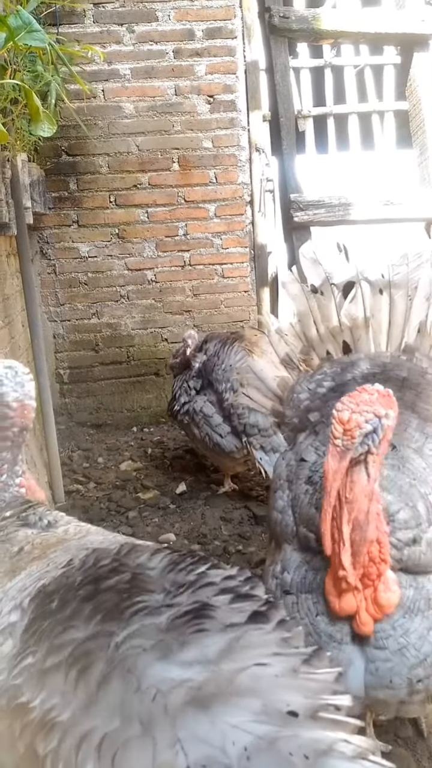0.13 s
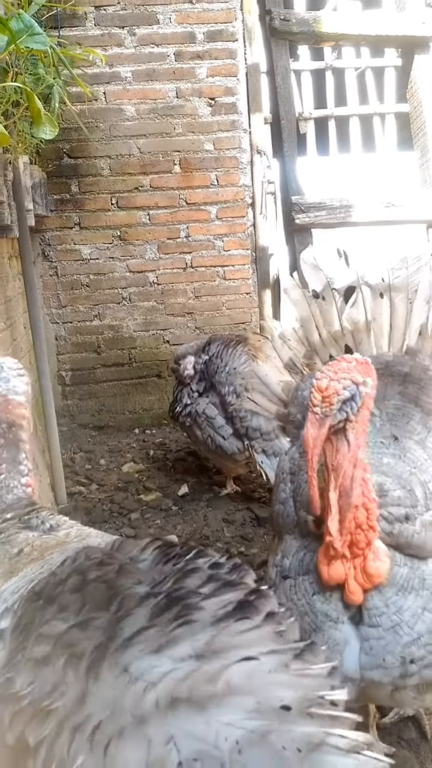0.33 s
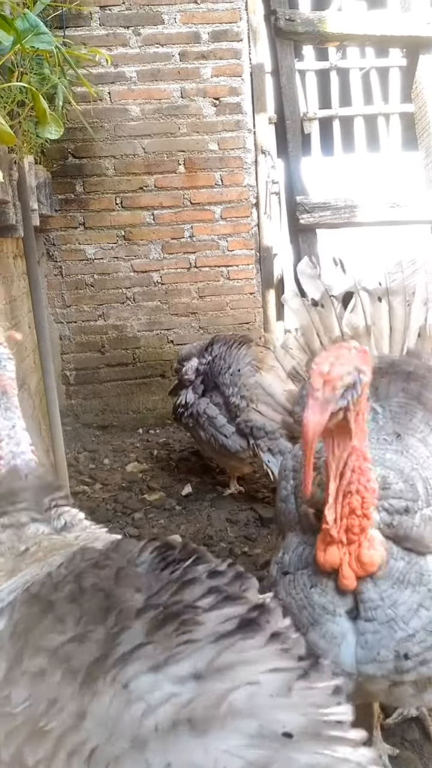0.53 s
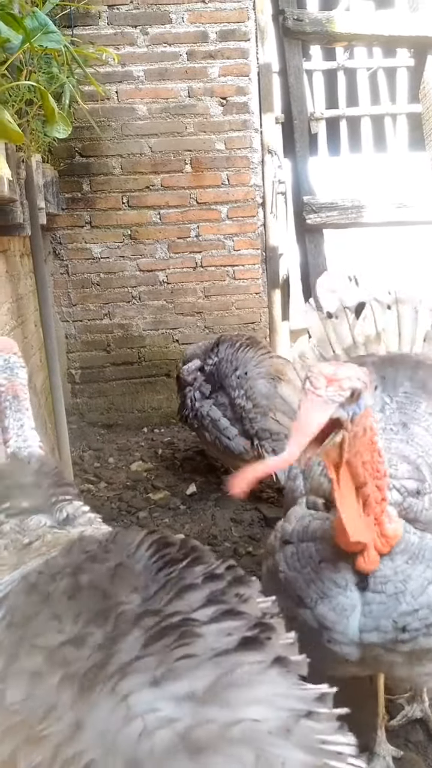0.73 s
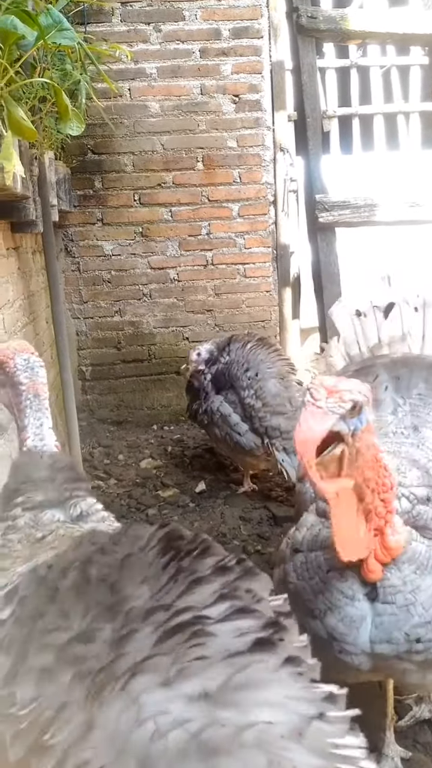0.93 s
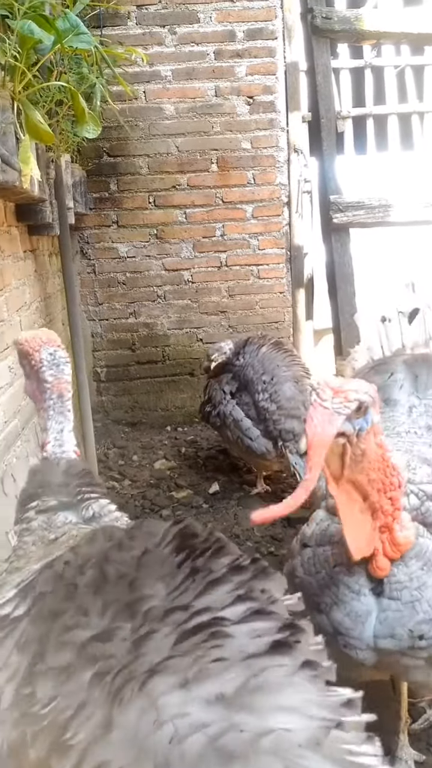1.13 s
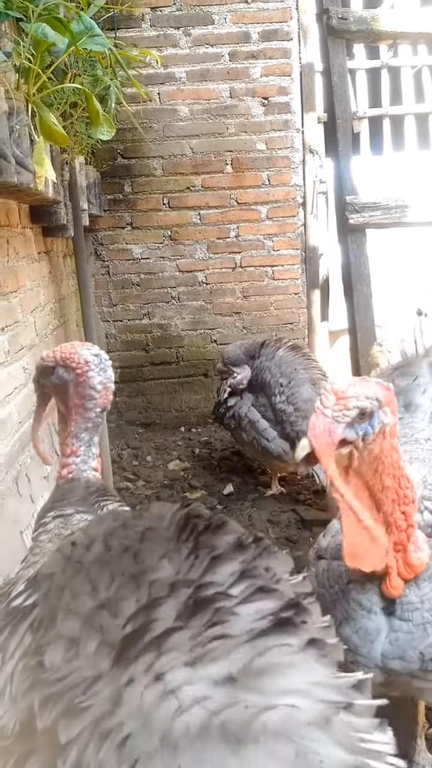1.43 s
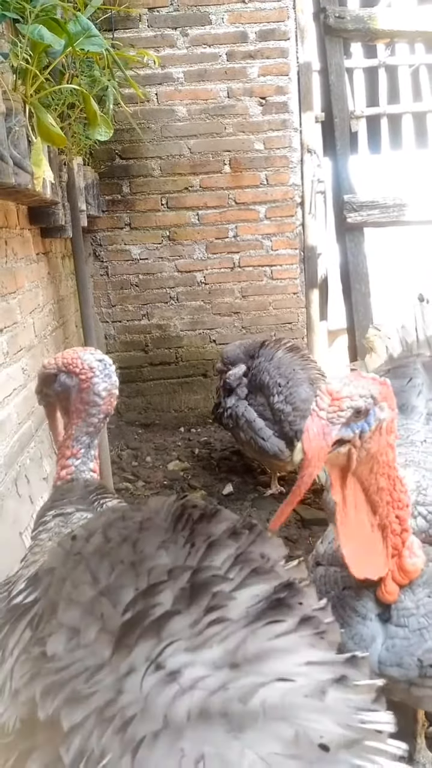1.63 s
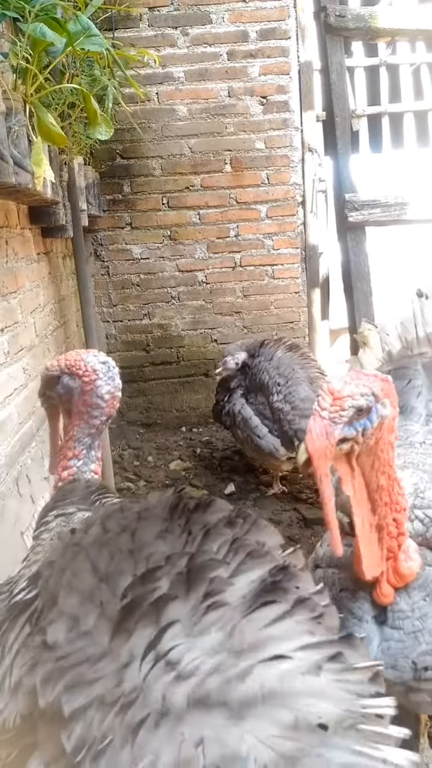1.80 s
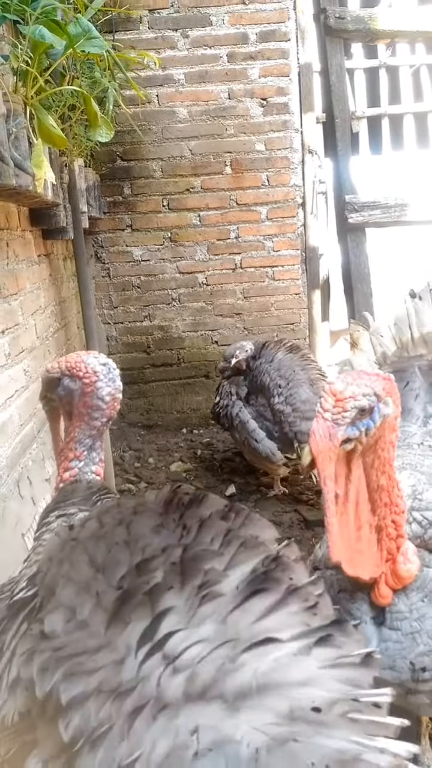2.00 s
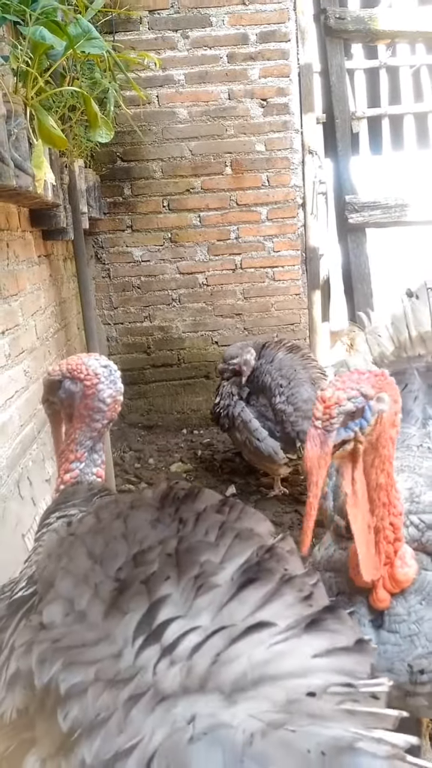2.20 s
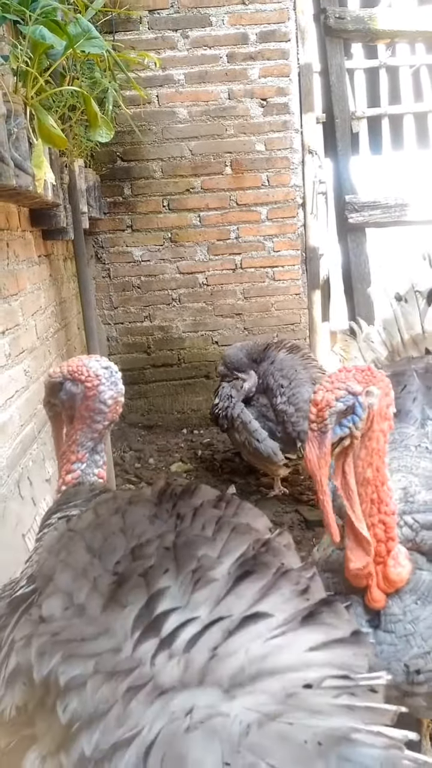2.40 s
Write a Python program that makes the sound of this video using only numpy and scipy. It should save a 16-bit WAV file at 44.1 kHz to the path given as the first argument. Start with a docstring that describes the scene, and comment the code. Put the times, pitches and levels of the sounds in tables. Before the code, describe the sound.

One loud, rattling turkey gobble in a small yard, followed by faint distant turkey calls.

```python
"""In a small brick yard a turkey gobbles close by: three clear yelps break into a rough rattle.
Pushes of air drive a membrane in its syrinx, and the resonances of windpipe and beak shape the tone and
its turbulence. Short whistles glide, most near 1 kHz, and a few bright overtones ring out higher up.
The wattle flaps, other turkeys answer faintly, feathers rustle and something taps once.
The walls reflect the calls, and a low hum and a thin high whine lie underneath."""
import sys
import numpy as np
from scipy import signal
from scipy.fft import rfft, irfft
from scipy.io import wavfile
from scipy.ndimage import uniform_filter1d

SR = 44100
rng = np.random.default_rng(int(sys.argv[2]) if len(sys.argv) > 2 else 0)


def to_wav(sig):
    """Store sig (one row per channel, or 1-D mono) as 16-bit WAV at the path in sys.argv[1].

    Samples outside -1..1 are clipped; the rate is SR.
    """
    pcm = np.clip(np.atleast_2d(sig), -1, 1) * 32767
    pcm = np.round(pcm).astype(np.int16)
    wavfile.write(sys.argv[1], SR, pcm.T)  # frames by channels


N = 112454
TIME = np.arange(N) / SR

# Envelope of the hum. Each row: time in seconds, level in dB.
HUM_ENVELOPE = [(0, -102), (.17, -64), (.22, -56), (1.05, -51.5), (1.3, -68), (1.85, -64.5), (1.96, -64),
                (2.02, -63), (2.12, -69), (2.22, -76), (2.55, -93)]
# Spectra of the steady noises. Each row: frequency in Hz, level in dB.
HUM_SPECTRUM = [(25, -29), (50, -27.5), (70, -8), (88, 3), (110, -9.5), (160, -18.5), (400, -32.5),
                (800, -46)]
AIR_SPECTRUM = [(30, -14.5), (70, -8.5), (130, 0.5), (350, -5), (800, -15), (2000, -12.5), (4000, -15),
                (5700, -18.5), (7000, -23.5), (11000, -21), (14000, -31.5)]
# Three stages of the gobble. Each row: time in seconds, pitch in Hz, roughness from 0 to 1.
YELPS = [(0.182, 527, 0.42), (0.214, 602.3, 0.08), (.24, 573.9, 0.22), (0.267, 577.2, 0.27),
         (.285, 662.3, 0.02), (.305, 712.6, 0), (0.321, 705, 0.04), (.337, 629.2, 0.14), (0.346, 560, 0.45),
         (.365, 609, 0.06), (0.389, 663.1, 0.01), (.422, 643, 0.04), (.442, 580, 0.3)]
GARGLE = [(0.482, 627.2, 0.92), (0.511, 593, 0.073), (0.549, 679, 0.45), (0.576, 673, 0.53),
          (0.592, 617, 0.04), (0.618, 597.4, 0.03), (0.636, 633.4, 0.14), (0.652, 720.5, 0.46),
          (0.692, 609.5, 0.95)]
RATTLE = [(0.749, 612.6, 0.58), (0.771, 662.1, .8), (0.813, 622.3, 0.45), (.843, 722.5, 0.57),
          (.868, 662, 0.37), (0.909, 596.5, 0.63), (.955, 664.4, 1), (0.984, 633.3, 0.31),
          (1.019, 600.6, 0.89), (1.064, 652.3, 0.4), (1.105, 646.3, 0.59), (1.145, 615, 0.97),
          (1.18, 591.5, 0.53)]
# Pushes of air. Each row: peak time, rise and fall in seconds, then levels in dB of the four bands
# of the voice: fundamental, octave, overtones and treble.
PUSHES = [(0.196, 0.0083, 0.0069, -31.5, -30.5, -35, -49), (0.213, 0.0063, 0.015, -25, -25, -10.5, -32.5),
          (0.229, 0.0043, 0.015, -30.5, -27, -14.5, -32.5), (.256, 0.012, 0.055, -36.5, -31, -29, -44),
          (0.292, 0.0075, 0.0049, -21, -4, -25, -36.5), (0.313, 0.02, 0.009, -23, -13, -16.5, -28),
          (.329, 0.0062, 0.004, -11.5, -20.5, -23.5, -27), (0.352, 0.0055, 0.013, -21.5, -19.5, -14.5, -43),
          (0.394, 0.026, 0.014, -21, -9.5, -21.5, -23.5), (.414, 0.0077, .012, -27.5, -15.5, -21.5, -19),
          (.429, 0.011, 0.0098, -11.5, -26, -21.5, -24), (0.489, 0.015, 0.005, -20.5, -15.5, -22.5, -30),
          (0.501, 0.011, 0.017, -13.5, -26, -26.5, -33.5), (0.545, 0.024, 0.016, -16, -18.5, -18.5, -27.5),
          (.569, 0.0066, 0.0069, -17, -13, -17, -24.5), (.586, 0.005, 0.0099, -15, -14.5, -26, -15),
          (0.61, 0.019, 0.015, -25, -24, -15.5, -26), (0.639, 0.018, 0.013, -16.5, -16.5, -24.5, -19),
          (.654, 0.0074, 0.012, -15, -20, -17, -26.5), (0.724, 0.0061, 0.009, -17.5, -31, -27.5, -31.5),
          (0.765, 0.0069, 0.014, -15, -24, -22.5, -24), (.843, 0.011, 0.016, -14, -21, -17.5, -18.5),
          (0.918, 0.005, 0.016, -20, -34.5, -29, -35), (0.958, 0.0068, 0.018, -23, -31.5, -25, -34.5),
          (0.991, 0.024, 0.058, -24, -42, -35, -52), (1.066, 0.012, 0.014, -26.5, -28.5, -22, -29),
          (1.106, 0.019, 0.012, -25.5, -34.5, -32.5, -48), (1.146, 0.011, 0.014, -19.5, -31.5, -29, -35),
          (1.177, 0.005, .008, -28, -26.5, -29, -30.5)]
# One fraction for each band: shimmer depth at full roughness; turbulent amplitude at zero roughness.
SHIMMER_DEPTHS = [.6, .6, .45, .3]
HOARSENESS = [.14, .08, .14, .3]
ROUGH_TURBULENCE = [.85, .6, .6, .9]  # turbulent amplitude added at full roughness
# Spectra of the upper two bands and of the breath. Each row: frequency in Hz, level in dB.
OVERTONE_SPECTRUM = [(1500, -25), (1750, -9), (2100, 4), (2400, 2.5), (2750, -4), (3050, -1), (3400, -6.5),
                     (3800, -57)]
TREBLE_SPECTRUM = [(3000, -38), (3600, -5), (4050, -4.5), (4500, -4), (5100, -17), (5900, -14.5),
                   (6700, -23.5), (8000, -10), (9200, -20), (10400, -11), (12000, -22), (14000, -28.5)]
PUFF_SPECTRUM = [(30, -7.5), (70, -10), (150, -6.5), (300, -8.5), (450, -3), (700, 6), (1500, 0)]
# Windpipe resonances. Each row: centre in Hz, width in Hz, level in dB.
HISS_RESONANCES = [(3960, 200, 1.5), (4430, 350, -3.5), (5050, 300, -5.5), (5710, 300, -5.5),
                   (8300, 500, -7.5), (10450, 670, -2.5)]
# Filter of the beak, and a further one while it is half shut. Each row: frequency in Hz, gain in dB.
BEAK_RESPONSE = [(40, -2.5), (380, -2), (500, -8), (600, -0.5), (700, -3), (790, -0.5), (1050, 0),
                 (1420, -1), (1600, -1.5), (14500, 0.5)]
HALF_SHUT_RESPONSE = [(40, 1), (3300, -1), (4100, -10.5), (4800, -1.5), (5800, 1), (7500, -5.5),
                      (10000, 7.5), (14500, 4.5)]
# Reflections from the ground and near walls. Each row: delay in seconds, gain in dB.
ECHOES = [(.0047, -24), (0.0107, -20.5), (.0192, -21.5)]
# Spectra of the yard's two reverberant tails. Each row: frequency in Hz, level in dB.
LOW_TAIL = [(60, 9.5), (2500, -2.5), (4000, -6)]
HIGH_TAIL = [(2200, -2), (3600, -7.0), (14000, 1.5)]
# Whistles, most near 1 kHz, with a few bright overtones of the voice higher up; and a distant squeak.
# Each row: peak time and half length in seconds, pitch in Hz, glide in Hz per second, level in dB.
WHISTLES_AND_OVERTONES = [(.329, .004, 3328, -25000, -24), (.357, 0.0096, 2342, 11000.5, -16.5),
                          (.494, .004, 3990, -15000, -23), (.547, 0.0092, 3870, -1, -24),
                          (.577, 0.0012, 3990, 1, -11), (.587, 0.0043, 4020, -4.5, -16),
                          (.644, 0.0023, 3993, -1.5, -16.5), (.676, 0.0071, 1076, -3000, -22),
                          (.715, 0.012, 1091, -1000, -25.5), (.763, 0.0044, 1046, 2014, -16.5),
                          (.782, 0.008, 1088, -3000, -12.5), (.829, .008, 978, 4499, -7.5),
                          (.872, 0.0076, 1065, 991.5, -22.5), (.917, 0.0046, 1034, -3000, -18.5),
                          (.958, 0.011, 1008, 2014, -21), (1.046, 0.0079, 987, 2009, -21),
                          (1.133, 0.0044, 1005, -6000, -19.5), (1.156, .009, 998.2, 2003, -26.5),
                          (1.176, 0.0043, 1100, 984, -22)]
SQUEAK = [(1.41, 0.0397, 3460, -400, -58)]
# Answering calls. Each row: peak time, rise and fall in seconds, pitch in Hz, then levels in dB
# of fundamental, octave and overtones.
ANSWERS = [(1.268, .015, 0.015, 615.6, -50, -39, -53), (1.345, .03, 0.072, 631.8, -43.5, -51.5, -52.5),
           (1.44, .035, 0.056, 572, -68.5, -52, -52), (1.545, .009, 0.093, 646.8, -50, -60, -52.5),
           (1.656, 0.009, 0.045, 545, -59.5, -51.5, -50), (1.76, .009, 0.066, 642, -50.5, -64.5, -53.5),
           (1.839, 0.034, 0.058, 555, -65, -64, -62.5), (1.997, .009, 0.0728, 646.7, -53, -63, -52.5),
           (2.07, .03, 0.038, 555, -61, -66.5, -59.5)]
# Overtones of the answers. Each entry: level in dB, from the third harmonic to the eighth.
ANSWER_HARMONICS = [-2, -16, -15.5, -17.5, -21.5, -29]
# Rasp and throat filter of the far birds. Each row: frequency in Hz, gain in dB.
ANSWER_RASP = [(300, -2.5), (1500, 9.5), (2400, -5), (3200, 0.5), (4200, -31), (11000, -9), (14000, -31)]
FAR_THROAT_RESPONSE = [(60, -3.5), (400, -9), (520, -1), (650, -2.5), (790, -19), (950, -0.5), (1100, 9.5),
                       (1280, 2), (1650, -15), (1930, 0), (2300, 9), (2780, -8.5), (3300, 6.5),
                       (12000, -8.5)]
# Spectrum of the tap. Each row: frequency in Hz, level in dB.
TAP_SPECTRUM = [(200, -22), (600, -16), (1050, 5), (1500, -4), (2300, -1), (3300, -15), (4200, -7),
                (7000, -22.5), (14000, -29)]
# Stereo width. Each row: frequency in Hz, level of side relative to mid in dB.
SIDE_RESPONSE = [(4200, -51.5), (5500, -32.5), (7500, -24), (11000, -16.5), (14000, -14.5)]


def undb(db):
    """Amplitude grows tenfold for every 20 dB."""
    return 10 ** (np.asarray(db) / 20)


def unit(x):
    """Normalisation to an rms of 1."""
    return x / np.sqrt(np.mean(x ** 2))


def gain_at(hz, points):
    """A frequency response, interpolated in dB, with a 24 dB per octave roll-off beyond its ends."""
    freqs, db = np.array(points, float).T
    inside = np.clip(hz, freqs[0], freqs[-1])
    roll_off = np.minimum((hz + 1) / inside, inside / (hz + 1)) ** 4
    return undb(np.interp(np.log(inside), np.log(freqs), db)) * roll_off


def colour(x, points):
    """Linear filtering multiplies the spectrum by a frequency response."""
    return irfft(rfft(x) * gain_at(np.fft.rfftfreq(N, 1 / SR), points), N)


def noise(points):
    """White noise takes on the spectrum of its filter."""
    return unit(colour(rng.standard_normal(N), points))


def ring(hz, width_hz):
    """A resonance driven by noise passes a narrow band about its centre."""
    detuning = (np.fft.rfftfreq(N, 1 / SR) - hz) / (width_hz / 2)
    return unit(irfft(rfft(rng.standard_normal(N)) / (1 + np.abs(detuning) ** 3), N))


def flutter(hz):
    """Random modulation with an rms of 1 and a bandwidth of about hz."""
    steps = np.arange(4000)
    wobble = np.interp(TIME * 2 * hz, steps, rng.standard_normal(len(steps)))
    return unit(uniform_filter1d(wobble, size=40))


def swell(peak, rise, fall):
    """Exponential growth and decay, joined by a rounded peak."""
    offset = (TIME - peak) / np.where(TIME < peak, rise, fall)
    return 1 / np.cosh(np.clip(1.236 * offset, -50, 50))


def background():
    """Bandwidth sets the character of noise: a low band hums, narrow ones whine, a broad one is air."""
    hum = undb(np.interp(TIME, *np.array(HUM_ENVELOPE).T)) * noise(HUM_SPECTRUM)
    whine = ring(4770, width_hz=85) + undb(-14.5) * ring(5656, width_hz=85)
    return hum + undb(-76.5 + 1.5 * TIME) * whine + undb(-73.5) * noise(AIR_SPECTRUM)


def overtones(hz, phase, spectrum, count, wander_db=3.5, wander_hz=28, slip_rad=.08):
    """Resonances weight the harmonics; phase modulation grows with their number and blurs the highest."""
    out, power = 0, 0
    for k in range(3, 3 + count):
        gain = gain_at(k * hz, spectrum) * undb(-2 * np.log2(k))
        waver = unit(undb(wander_db * flutter(wander_hz)))
        slip = k * slip_rad * flutter(k * wander_hz / 2)
        out = out + gain * waver * np.sin(k * phase + k * k + slip)
        power = power + gain ** 2 / 2
    return out / np.sqrt(power)


def hiss():
    """Turbulence excites narrow windpipe resonances, each fluttering on its own, over a broad rush."""
    rings = sum(undb(db + 2.5 * flutter(60)) * ring(hz, width) for hz, width, db in HISS_RESONANCES)
    return unit(unit(rings) + undb(-2) * noise(TREBLE_SPECTRUM))


def syrinx(hz, rough, jitter=.04, jitter_hz=170.26, shimmer_hz=130.7):
    """Airflow vibrates a membrane; roughness adds jitter and shimmer and turns tone into turbulence."""
    envelopes = np.sqrt(sum((undb(row[3:])[:, None] * swell(*row[:3])) ** 2 for row in PUSHES))
    phase = 2 * np.pi * np.cumsum(hz * (1 + jitter * rough * flutter(jitter_hz))) / SR
    flow = unit(1 + .5 * np.cos(phase))  # the air pulses once a cycle
    tones = [unit(np.sin(phase)), unit(np.sin(2 * phase)),
             overtones(hz, phase, OVERTONE_SPECTRUM, count=5),
             overtones(hz, phase, TREBLE_SPECTRUM, count=13)]
    turbulence = [ring(577, width_hz=140), ring(1312, width_hz=750),
                  flow * noise(OVERTONE_SPECTRUM), flow * hiss()]
    out = 0
    for band, envelope in enumerate(envelopes):
        share = np.clip(HOARSENESS[band] + ROUGH_TURBULENCE[band] * rough, 0, .95)
        blend = np.sqrt(1 - share ** 2) * tones[band] + share * turbulence[band]
        depth = SHIMMER_DEPTHS[band] * rough
        shimmer = (1 + depth * flutter(shimmer_hz)) / np.sqrt(1 + depth ** 2)
        out = out + envelope * shimmer * blend
    puff = undb(-25.5) * np.hypot(envelopes[0], envelopes[2]) * noise(PUFF_SPECTRUM)
    return out + puff


def near_turkey(start_s=.182, beak_opens_s=.35):
    """Source and filter: voice and whistles sound through a beak that opens wide at the third yelp."""
    times, *contours = np.array(YELPS + GARGLE + RATTLE).T
    hz, rough = (uniform_filter1d(np.interp(TIME, times, row), size=250) for row in contours)
    call = syrinx(hz, np.clip(rough, 0, 1)) + gliding_tones(WHISTLES_AND_OVERTONES, jitter=.019)
    opening = .5 + .5 * np.tanh((TIME - beak_opens_s) / .0067)
    call = opening * call + (1 - opening) * colour(call, HALF_SHUT_RESPONSE)
    onset = np.clip((TIME - start_s) / .0079, 0, 1)
    return onset * colour(call, BEAK_RESPONSE)


def yard(x, delay_s=.008):
    """Reflections between brick walls merge into exponential reverberation; the treble dies sooner."""
    age = np.maximum(TIME - delay_s, 0)

    def tail(spectrum, t60_s, db):
        response = noise(spectrum) * undb(-60 * age / t60_s) * (age > 0)
        weight = gain_at(np.fft.rfftfreq(N, 1 / SR), spectrum) ** 2
        return undb(db) * response / np.sqrt(np.sum(np.abs(rfft(response)) ** 2) / np.sum(weight))

    walls = tail(LOW_TAIL, t60_s=.33, db=-8) + tail(HIGH_TAIL, t60_s=.27, db=-12)
    return signal.fftconvolve(x, walls)[:N]


def gliding_tones(rows, jitter):
    """A short frequency-swept sinusoid is heard as a whistle, a squeak or one bright overtone."""
    out, waver = 0, 1 + jitter * flutter(120)
    for peak, half, hz, glide, db in rows:
        pitch = (hz + glide * np.clip(TIME - peak, -2 * half, 2 * half)) * waver
        tone = unit(np.sin(2 * np.pi * np.cumsum(pitch) / SR))
        out = out + undb(db) * swell(peak, half, half) * tone
    return out


def wattle():
    """The flapping wattle displaces air, giving a swell of low noise."""
    return undb(-49) * swell(peak=.92, rise=.13, fall=.13) * ring(262, width_hz=280)


def far_turkeys(sag_hz_per_s=280, jitter=.011, shimmer=.2):
    """Throat resonances filter faint harmonic calls, mostly high and low in turn, each sagging in pitch."""
    rasp = undb(-5) * noise(ANSWER_RASP)
    hollow = undb(-4.5) * ring(570, width_hz=120)
    out = 0
    for peak, rise, fall, hz, low_db, octave_db, upper_db in ANSWERS:
        pitch = hz - sag_hz_per_s * np.clip(TIME - peak, -2 * rise, 2 * fall)
        phase = 2 * np.pi * np.cumsum(pitch * (1 + jitter * flutter(120))) / SR
        upper = sum(undb(db) * np.sin(k * phase) for k, db in enumerate(ANSWER_HARMONICS, start=3))
        call = (undb(low_db) * (np.sin(phase) + hollow)
                + undb(octave_db) * np.sin(2 * phase)
                + undb(upper_db) * (upper + rasp))
        out = out + call * swell(peak, rise, fall) * (1 + shimmer * flutter(130))
    return colour(out, FAR_THROAT_RESPONSE) + gliding_tones(SQUEAK, jitter=.0045)


def feathers():
    """Friction between feathers gives a brief band of high noise."""
    return undb(-68) * swell(peak=1.632, rise=.038, fall=.038) * ring(10500, width_hz=2400)


def tap():
    """A soft impact is a broadband transient with a fast rise and a slower decay."""
    return undb(-61) * swell(peak=2.2687, rise=.0028, fall=.03) * noise(TAP_SPECTRUM)


def scene():
    """Direct and reflected sounds superpose in the centre; only the high treble has some width."""
    near = near_turkey()
    near = near + sum(undb(db) * np.interp(TIME - delay, TIME, near) for delay, db in ECHOES)
    far = far_turkeys()
    far = undb(-2) * (far + 1.57 * yard(far))  # distance raises the reverberant share
    mid = background() + near + yard(near) + wattle() + far + feathers() + tap()
    quadrature = np.imag(signal.hilbert(colour(mid, SIDE_RESPONSE)))
    side = quadrature * flutter(500)
    return np.array([mid + side, mid - side])


def record(dry, ceiling=.85, cutoff_hz=14300):
    """Soft saturation rounds the loudest peaks, and a steep low-pass filter cuts the top."""
    soft = dry / (1 + (dry / ceiling) ** 6) ** (1 / 6)
    return signal.sosfilt(signal.ellip(10, .2, 80, cutoff_hz, fs=SR, output="sos"), soft)


dry = scene()
out = record(dry)
to_wav(out)
```